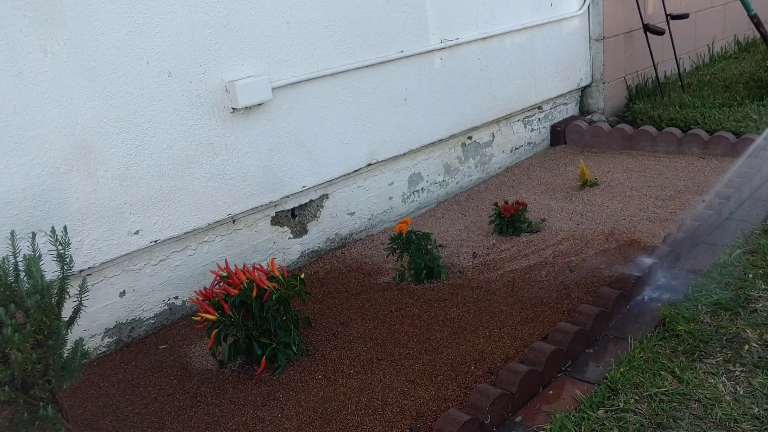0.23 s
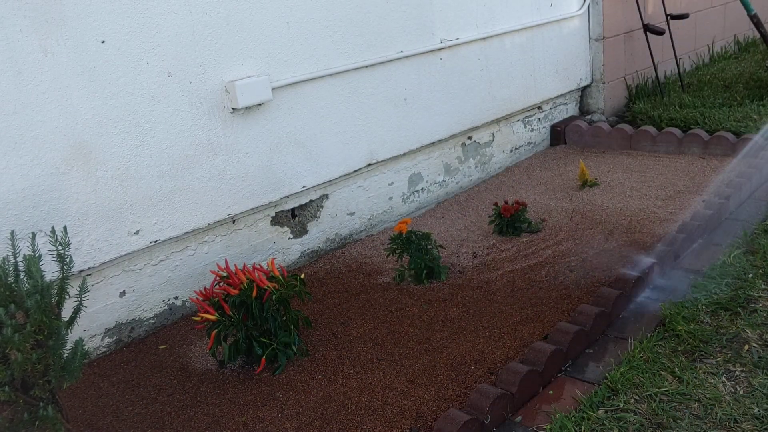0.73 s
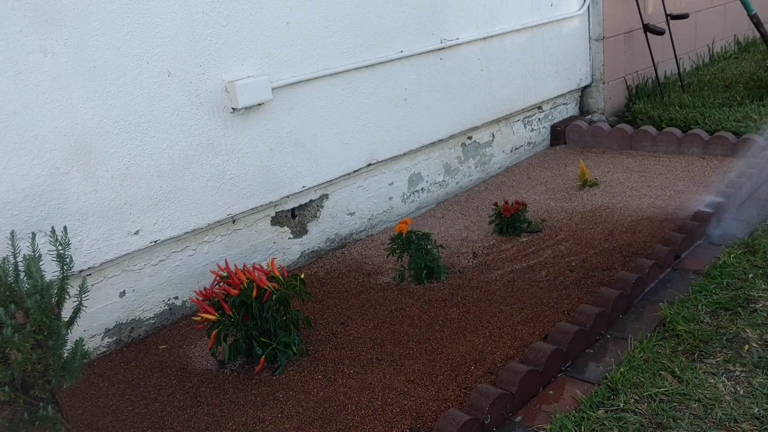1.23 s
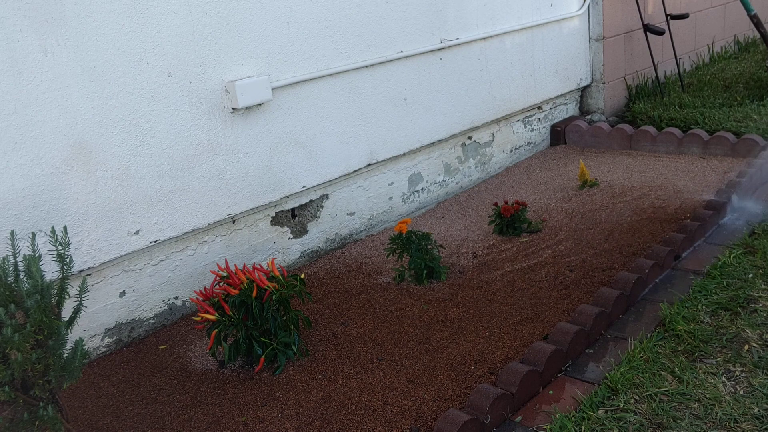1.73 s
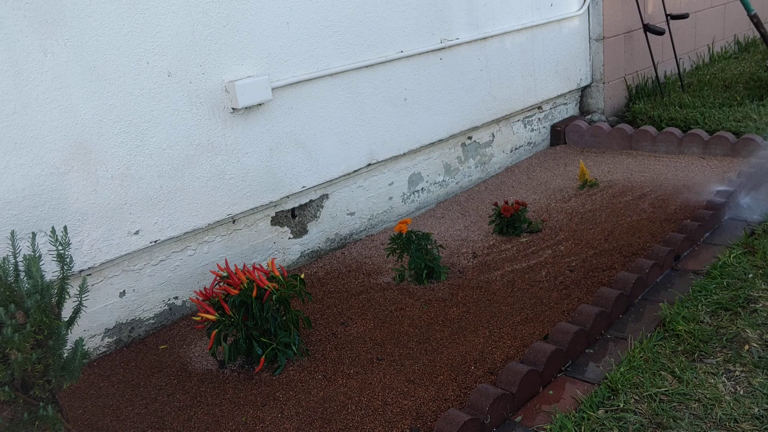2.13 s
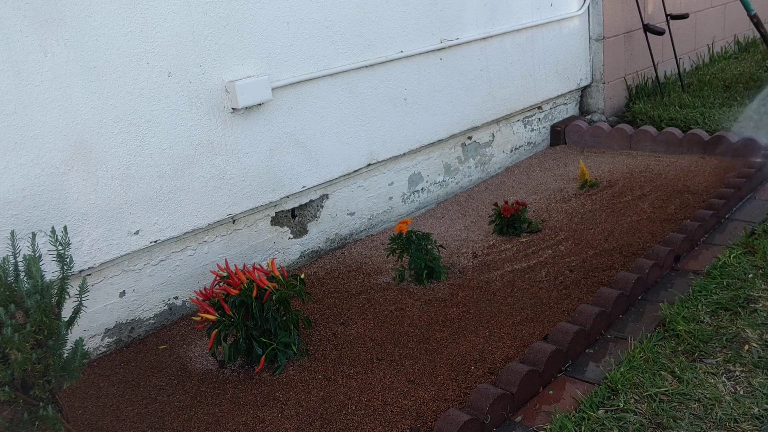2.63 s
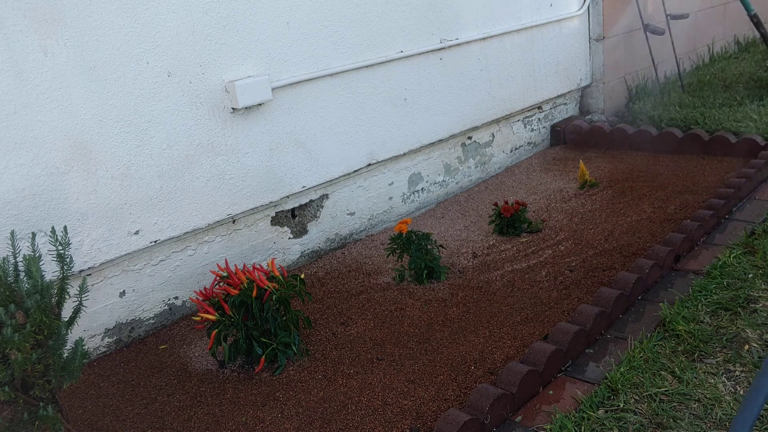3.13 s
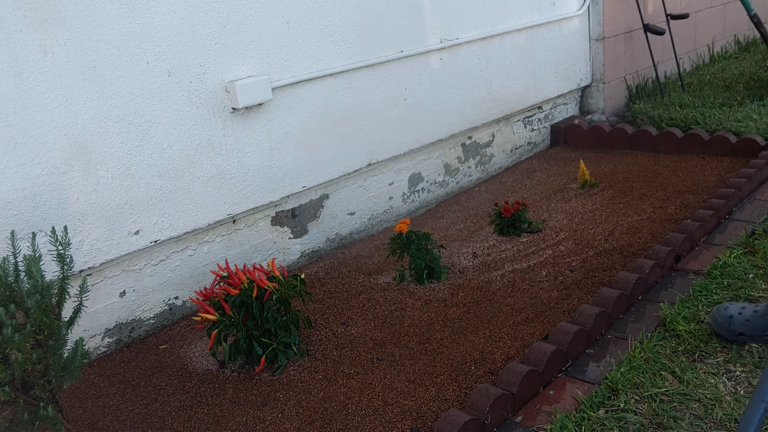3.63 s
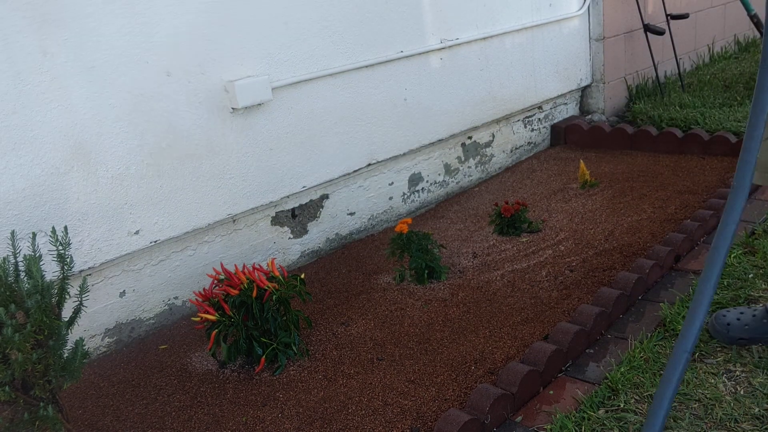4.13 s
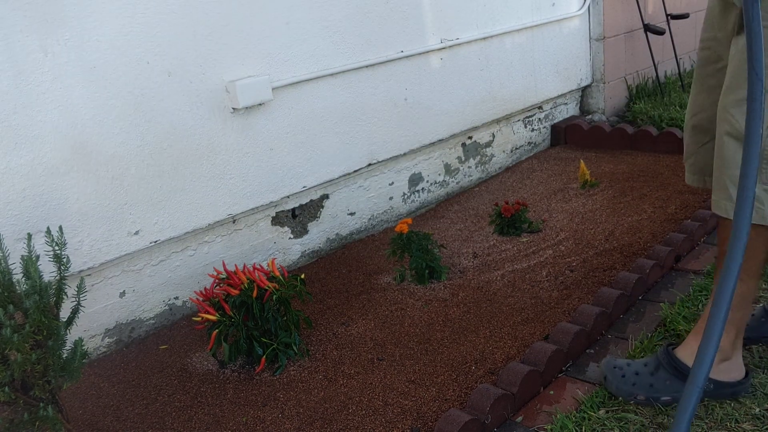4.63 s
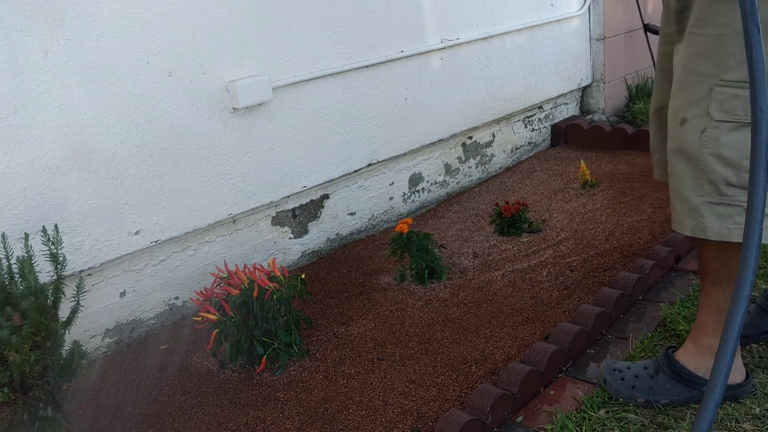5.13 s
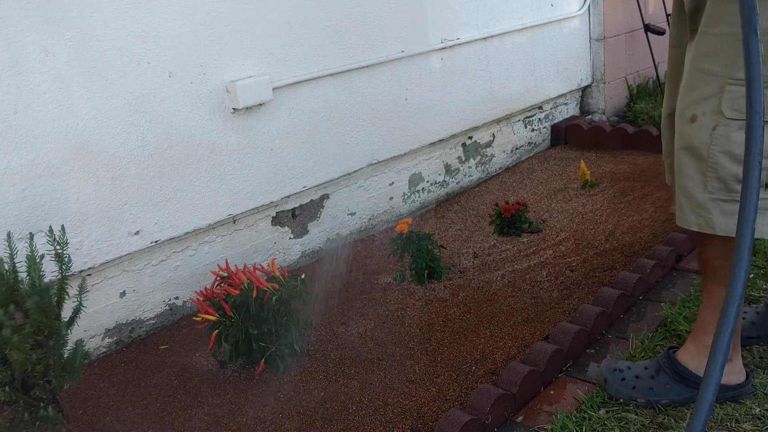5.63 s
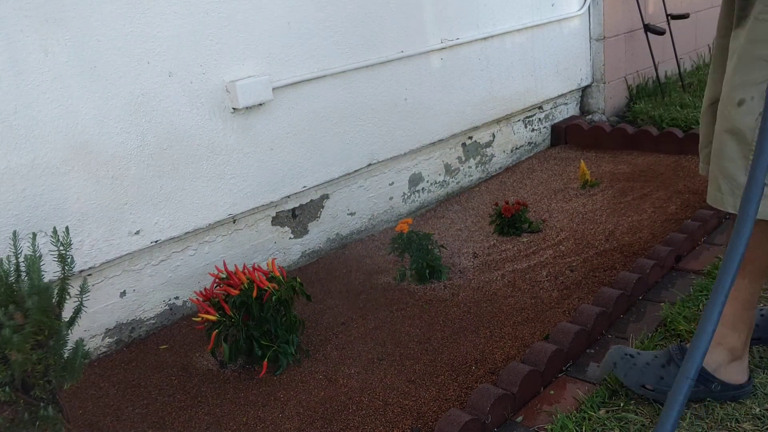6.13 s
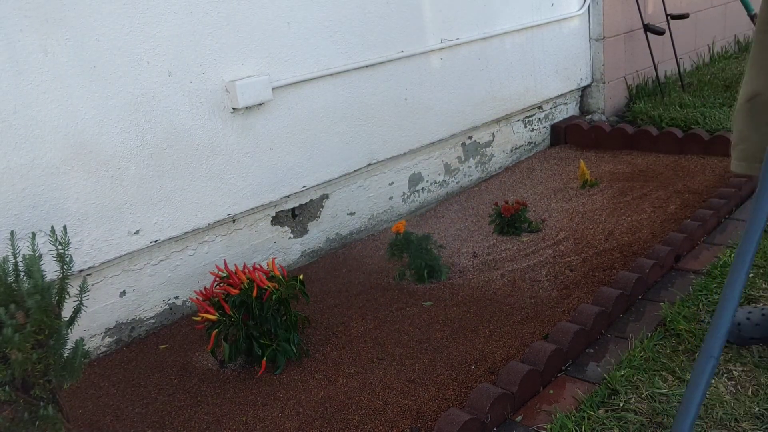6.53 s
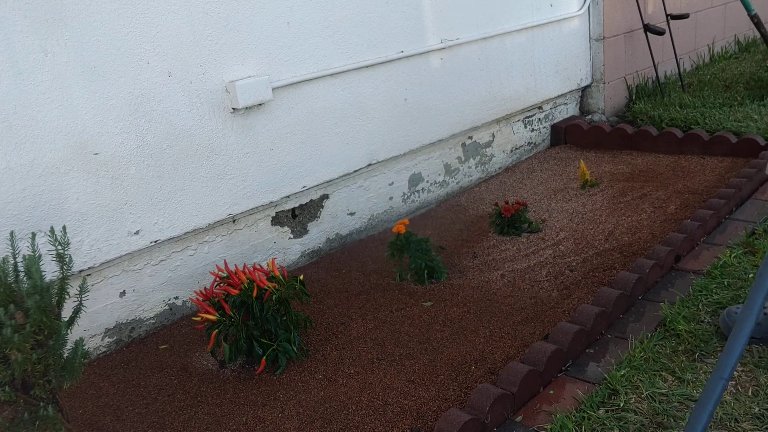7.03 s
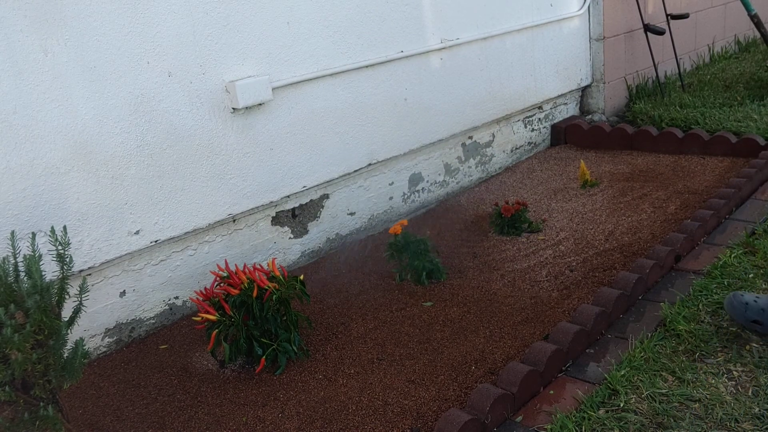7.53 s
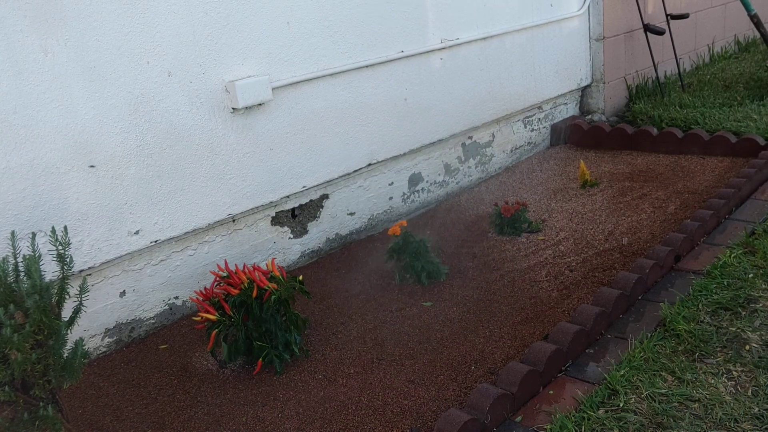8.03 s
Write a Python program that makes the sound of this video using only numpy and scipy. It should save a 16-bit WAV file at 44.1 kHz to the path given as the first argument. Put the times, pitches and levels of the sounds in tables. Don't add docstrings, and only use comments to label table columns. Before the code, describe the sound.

In an open garden, a small stereo camera microphone catches fine hose water landing close on the right from 0 to about 2.6 seconds: a dense, bright hiss with a sharp edge, surging around 0.5, 1 and 1.6. Large drops tick near 1.9, 2.5 and 2.8. The spray then falls well back, turning coarser and wider, with quick flicks from 3.3 to 4. A tiny hollow knock and rising plop come at 3.7, a faint scuff at 3.9. Sweeps swell gently around 4.8, 5.6, 6.1 and 7.1, and build again toward 8.1. Shoe grit scrapes at 6.7, 7.1 and briefly at 7.3, alongside a clear drop tick. Soft traffic rumble lasts throughout, with a car's fuller low roar from 4.1 slowly easing. A distant engine drones low and wavering, its pitch sagging after 7 seconds.

```python
import sys
import numpy as np
from scipy import signal
from scipy.io import wavfile
from scipy.ndimage import uniform_filter1d

SR = 44100
rng = np.random.default_rng(int(sys.argv[2]) if len(sys.argv) > 2 else 0)


def inscribe(sig):
    pcm = np.round(np.clip(np.atleast_2d(sig).T, -1, 1) * 32767)
    wavfile.write(sys.argv[1], SR, pcm.astype(np.int16))


def makeup_ratio(level_db):
    decades = np.asarray(level_db, float) / 20
    return 10 ** decades


N = 366030

# time_s, strength_db, coarse_over_mist_db
SPRAY_REACH = [(0, -41.5, -10), (.3, -36, -9), (.53, -39, -9), (.76, -35, -11), (1.09, -36.5, -11.5),
               (1.29, -44, -12), (1.57, -36.5, -10.5), (1.9, -42, -10), (2.4, -39.5, -13.5),
               (2.68, -50.5, -8.5), (3.07, -55.5, -6), (3.28, -56.5, -7), (3.6, -50, -3.5),
               (4.9, -49.5, -6), (5.6, -44, -7), (5.95, -52, -6), (7.3, -51, -5.5), (8.3, -51, -5.5)]
# peak_s, swell_db, rise_s, fall_s
WRIST_FLICKS = [(2.77, 7, 0.059, 0.094), (3.35, 8, 0.063, 0.13), (3.49, 9, 0.025, 0.18),
                (3.68, 5.5, 0.041, 0.047), (3.77, 5, 0.033, .03), (3.95, 8, .05, 0.21),
                (4.3, 2.5, .2, 0.12), (4.53, 3, 0.17, .18), (4.78, 6, 0.079, .17), (4.97, 4.5, 0.048, 0.5),
                (5.5, 3.5, .1, 0.03), (5.64, -0.5, .08, .04), (5.71, 1.5, 0.06, 0.068),
                (5.85, 6, 0.22, 0.098), (6.09, 7.5, 0.14, 0.31), (6.38, 5, 0.14, 0.85),
                (6.8, 5, 0.077, 0.058), (7.09, 7.5, 0.047, 0.1), (7.19, 4, 0.044, .07),
                (7.35, 3.5, 0.034, 0.059), (7.44, 3.5, 0.077, 0.14), (7.67, 1.5, 0.055, 0.15),
                (8.09, 5.5, 0.65, .05), (8.3, 4, 0.1, .05)]
# time_s, treble_left_minus_right_db, left_lag_samples, left_right_likeness (0-1)
SPRAY_AIM = [(0, -11, 8.5, 0.6), (.18, -10.5, 6.5, 0.8), (.45, -11, 9, 0.55), (.62, -9.5, 7.5, 0.9),
             (1.05, -7.5, 7.5, 0.9), (1.35, -9, 10.5, 0.6), (1.65, -10.5, 7.5, .8), (1.92, -10, 10, 0.57),
             (2.8, -11.5, 11, 0.52), (3.2, -7, 7.5, 0.1), (3.9, 1, -4, 0.29), (4.6, 6, -13, 0.42),
             (5.4, 1, -9.5, 0.18), (6, -2, 0.5, 0.12), (6.3, -1.5, -4.5, 0.24), (6.8, -3.5, -0.5, 0.36),
             (7.2, -1.5, -1, 0.35), (8.3, -2, -0.5, 0)]
# pitch_hz, level_db (per Hz)
MIST_COLOUR = [(800, -23.5), (1500, -12), (2500, -6.5), (4000, -0.5), (7000, 0.03), (10000, -1),
               (15000, -5)]
# pitch_hz, share
COARSE_SHARE = [(1200, 1), (2300, 0.92), (4000, 0.41), (6000, 0.016)]
# pitch_hz, share
FIZZ_SHARE = [(8000, 0.04), (11000, 0.46), (15000, 1.7)]
# pitch_hz, share
SHADE_SHARE = [(1500, 0.33), (3000, 0.36), (5000, 0.3), (12000, 0.74)]
# pitch_hz, likeness_factor
LIKENESS_FOCUS = [(1500, 0.6), (2700, 3.06), (3600, 1), (4700, 2.37), (7000, 0.81), (12000, 0.29),
                  (15000, .2)]
# start_s, peak_db, left_minus_right_db
LARGE_DROPS = [(1.9405, -20, -16), (2.539, -21.5, -7), (2.783, -22, -4.0), (3.9345, -26, -2),
               (5.1086, -27, -4.0), (5.9728, -32, -4.0), (7.3415, -18.5, -8)]
# start_s, length_s, level_db, centre_hz, width_hz
SHOE_SCUFFS = [
    (3.93, 0.12, -52, 4200, 2520),
    (4.038, .08, -58, 2460, 1400),
    (6.716, .135, -51, 3740, 1460),
    (7.075, 0.17, -47.5, 3200, 1520),
    (7.339, 0.038, -46.5, 3330, 2010),
]
# pitch_hz, level_db, fade_by_60db_s
KNOCK_TONES = [(500, -36, .02), (800, -35, .022), (1100, -34, .024)]
# start_s, level_db, from_hz, to_hz, length_s
AIR_PLOP = (3.681, -49, 950, 1350, .028)
# time_s, firing_hz
ENGINE_FIRING = [(0, 69.25), (2, 70.24), (4.2, 70.5), (6, 70.08), (6.9, 69.9), (7.4, 67.14), (8.3, 64.46)]
# time_s, level_db
ENGINE_DRONE = [(0.0, -41), (0.04, -38), (0.55, -45), (2.06, -39.5), (2.29, -46.5), (2.33, -41),
                (2.66, -50.5), (2.87, -40.5), (3.19, -51), (3.26, -42), (3.83, -46), (4.44, -39),
                (4.85, -47.5), (4.97, -40), (7.28, -44), (7.37, -40.5), (8.25, -44.5), (8.3, -50)]
# order, start_s, end_s, level_db
ENGINE_CARRY = [(2, 0, 0.44, -55), (2, 1.1, 2.5, -54.5), (2, 3, 3.9, -56.5), (2, 3.95, 5.3, -50),
                (2, 5.6, 7.45, -51), (2, 7.8, 8.4, -63), (3, 0, 7.1, -59.5), (3, 2.15, 2.95, -60),
                (3, 4, 6.1, -58.5), (4, 0, 7.3, -67), (4, 2.3, 2.75, -61), (5, 1.5, 3.55, -67.5),
                (5, 4, 7.3, -60.5), (5, 7.5, 8.4, -61.5), (6, 4.2, 5.7, -72), (7, 4.15, 4.55, -66)]
# pitch_hz, level_db (per Hz)
STREET_COLOUR = [(12, -35), (22, 0.5), (40, 1.5), (55, -8.5), (90, -2), (125, -1.5), (165, -13.5),
                 (250, -16), (310, -14.5), (450, -22), (750, -17.5), (1100, -23), (1600, -26.5),
                 (4000, -36.5)]
# pitch_hz, left_right_likeness
STREET_LIKENESS = [(60, 0.95), (180, 0.86), (550, 0.19), (1650, 0.022), (4970, 0.041), (15000, 0.02)]
# pitch_hz, left_minus_right_db
STREET_LEAN = [(40, 3.5), (150, 0.57), (300, 0.26), (1000, 1.3)]
# pitch_hz, level_db
LEFT_PORT = [(2000, 0), (3000, 1), (4000, 4.5), (5000, 5), (5600, 5.5), (6300, 0.5), (8000, -2),
             (10000, -5.5), (15000, -4)]
# pitch_hz, level_db
RIGHT_PORT = [(2000, 0), (4000, 1), (5500, 7.5), (6300, 14), (6900, 18.5), (7500, 14), (8500, 8.5),
              (10000, 5), (15000, 0)]


def evened(x):
    return x / np.sqrt(np.mean(x ** 2) + 1e-20)


def read(points, hz):
    f, value = np.transpose(points)
    return np.interp(np.log(hz + 1), np.log(f + 1), value)[:, None]


def columns(rows, t):
    s, *rest = np.transpose(rows)
    return [np.interp(t, s, column) for column in rest]


def patches(shape, size):
    field = rng.standard_normal(shape[::-1]).T
    field = uniform_filter1d(field, size[0], axis=0)
    return evened(uniform_filter1d(field, size[1], axis=1))


def add(mix, s, sound):
    start = round(s * SR)
    part = mix[..., start:start + sound.shape[-1]]
    part += sound


def droplets(per_s, spread_db):
    size = makeup_ratio(spread_db * np.minimum(rng.exponential(size=(2, N)), 5))
    hits = rng.standard_normal((2, N)) * (rng.random((2, N)) < per_s / SR)
    return evened(size * hits)


def wrist_swell(t):
    swell_db = 0
    for s, db, rise, fall in WRIST_FLICKS:
        swell_db = swell_db + db * np.clip(1 - np.maximum((s - t) / rise, (t - s) / fall), 0, 1)
    return swell_db


def spray():
    impacts = droplets(per_s=14000, spread_db=0.0)
    hz, t, (near, scattered) = signal.stft(impacts, SR, nperseg=256, noverlap=192)
    reach_db, coarse_db = columns(SPRAY_REACH, t)
    swell_db = wrist_swell(t)
    level_db = reach_db + swell_db
    coarse_db = coarse_db - 0.26 * swell_db
    fizz_db = -8.5 - 0.11 * (reach_db + 43.5) - 0.47 * swell_db

    field_db = level_db + 0.98 + read(MIST_COLOUR, hz)
    field_db += (coarse_db + 13.5) * read(COARSE_SHARE, hz)
    field_db += (fizz_db + 10.5) * read(FIZZ_SHARE, hz)
    field_db += 0.71 * patches(near.shape, size=(8, 30))
    field_db += 0.22 * patches(near.shape, size=(60, 8))
    field_db += 1.46 * patches(near.shape, size=(40, 90)) * read(FIZZ_SHARE, hz)

    pan_db, lag, same = columns(SPRAY_AIM, t)
    surge_db = level_db - uniform_filter1d(level_db, size=600)
    same = same * (1 + 0.18 * surge_db)
    same = np.clip(same * read(LIKENESS_FOCUS, hz), 0, 1)
    delayed = near * np.exp(-2j * np.pi * hz[:, None] * lag / SR)
    left = same * delayed + np.sqrt(1 - same ** 2) * scattered
    shade_db = (pan_db + 9.0) * read(SHADE_SHARE, hz)
    pair = np.array([left * makeup_ratio(0.6 * shade_db), near * makeup_ratio(-0.2 * shade_db)]) * makeup_ratio(field_db)
    return signal.istft(pair, SR, nperseg=256, noverlap=192)[1][:, :N]


def large_drops():
    out = np.zeros((2, N))
    tick = np.sin(2 * np.pi * 6300 * np.arange(22) / SR) * signal.windows.hann(22)
    for s, db, pan_db in LARGE_DROPS:
        add(out, s + 0.0006, makeup_ratio(db - 12.5 + np.array([[pan_db], [0]])) * tick)
    return out


def shoe_scuffs():
    out = np.zeros((2, N))
    for s, length, db, hz, width in SHOE_SCUFFS:
        size = round(length * SR)
        grit = rng.standard_normal(size=9000) * makeup_ratio(3.7 * rng.exponential(size=9000))
        band = signal.butter(2, [hz - width / 2, hz + width / 2], "band", fs=SR, output="sos")
        scrape = evened(signal.sosfilt(band, grit))[:size]
        add(out, s, makeup_ratio(db) * scrape * signal.windows.tukey(size, 0.6))
    return out


def hollow_knock():
    out, t = np.zeros((2, N)), np.arange(4410) / SR
    for hz, db, t60 in KNOCK_TONES:
        ring = makeup_ratio(db - 60 * t / t60) * np.sin(2 * np.pi * hz * t)
        add(out, 3.6732, ring * np.minimum(t / 0.00148, 1))
    s, db, from_hz, to_hz, length = AIR_PLOP
    u = np.arange(round(length * SR)) / (length * SR)
    glide_hz = from_hz + (to_hz - from_hz) * np.sqrt(u)
    swell = np.sin(np.pi * np.sqrt(u))
    add(out, s, makeup_ratio(db) * swell * np.sin(2 * np.pi * np.cumsum(glide_hz) / SR))
    return out


def engine():
    t = np.arange(N) / SR
    size = np.zeros((7, N))
    size[0] = makeup_ratio(columns(ENGINE_DRONE, t)[0] + 3)
    for order, start, end, db in ENGINE_CARRY:
        gate = np.clip(np.minimum(t - start, end - t) / 0.062, 0, 1)
        size[int(order) - 1] += makeup_ratio(db + 3) * gate
    turns = np.cumsum(columns(ENGINE_FIRING, t)[0]) / SR
    waver = signal.resample(rng.standard_normal(size=(120, 7)), N).T
    fading = signal.resample(rng.standard_normal(size=(70, 7)), N).T
    orders = np.arange(1, 8)[:, None]
    tones = np.cos(2 * np.pi * orders * turns + 0.48 * waver)
    drone = (size * makeup_ratio(1.67 * fading) * tones).sum(axis=0)
    return drone * makeup_ratio([[1.1], [-1.1]])


def street():
    frames, hz = N // 512 + 5, np.fft.rfftfreq(2048, 1 / SR)
    a, b, c, d = rng.standard_normal(size=(frames, 1025, 4)).T
    left, other = a + 1j * b, c + 1j * d
    same = np.clip(read(STREET_LIKENESS, hz), -1, 1)
    right = same * left + np.sqrt(1 - same ** 2) * other
    pan_db = read(STREET_LEAN, hz) / 2
    pair = np.array([left * makeup_ratio(pan_db), right * makeup_ratio(-pan_db)])

    since = np.arange(frames) * 512 / SR - 4.14
    car_rise_s, car_fade_s, car_peak_db = 0.067, 8, 4
    car_db = car_peak_db * np.exp(-np.maximum(since, 0) / car_fade_s) / (1 + np.exp(-since / car_rise_s))
    car_share = np.exp(-np.log((hz[:, None] + 1) / 350) ** 2 / 0.5)
    pair *= makeup_ratio(read(STREET_COLOUR, hz) + car_db * car_share + 1.39 * patches(a.shape, size=(10, 10)))
    return makeup_ratio(-44.5) * evened(signal.istft(pair, nperseg=2048, noverlap=1536)[1][:, :N])


def shut_patches(x, gate_db, tilt_db, masking, depth_db, from_hz):
    hz, t, z = signal.stft(x, SR, "cosine", nperseg=2048, noverlap=1024)
    power = abs(z) ** 2 + 1e-20
    broad = uniform_filter1d(power, size=61, axis=1) + 1e-20
    dip_db = 10 * np.log10(uniform_filter1d(power, size=7, axis=1) / broad + 1e-9)
    under_db = 10 * np.log10(broad[::-1] / broad)
    limit_db = gate_db + tilt_db * np.log2(hz[:, None] / 5000 + 0.01)
    limit_db = limit_db + masking * np.clip(under_db, -6, 12)
    shut = uniform_filter1d(1.0 * (dip_db < limit_db), size=7, axis=1) > 0
    treble = np.clip(hz / from_hz - 1, 0, 1)[:, None]
    gain = makeup_ratio(-depth_db * shut * treble)
    return signal.istft(z * gain, SR, "cosine", nperseg=2048, noverlap=1024)[1][:, :N]


def microphone_ports(dry):
    hz = abs(np.fft.fftfreq(4096, 1 / SR))
    port_db = np.array([read(port, hz)[:, 0] for port in (LEFT_PORT, RIGHT_PORT)])
    log_gain = port_db * np.log(10) / 20
    taps = np.fft.ifft(np.exp(np.conj(signal.hilbert(log_gain)))).real[:, :1024]
    return signal.oaconvolve(dry, taps, axes=1)[:, :N]


def scene():
    return spray() + large_drops() + shoe_scuffs() + hollow_knock() + engine() + street()


def roll_off(x):
    return signal.sosfilt(signal.butter(12, 16430, fs=SR, output="sos"), x)


def record(dry):
    ported = microphone_ports(dry)
    cleaned = shut_patches(ported, gate_db=-3.5, tilt_db=0.05, masking=0.15, depth_db=34, from_hz=1360)
    edge = signal.firwin(511, 15560, window=("kaiser", 9), fs=SR)
    mix = signal.oaconvolve(cleaned, edge[None], "same")
    return roll_off(mix)


dry = scene()
out = record(dry)
inscribe(out)
```